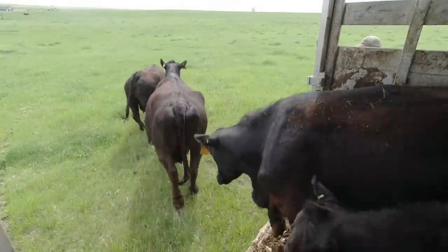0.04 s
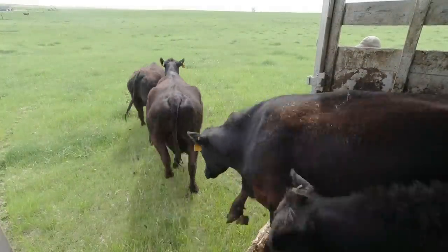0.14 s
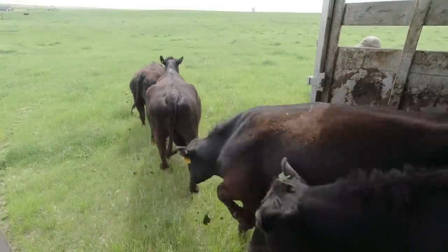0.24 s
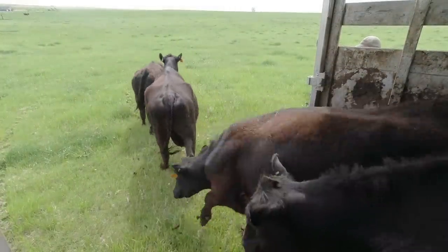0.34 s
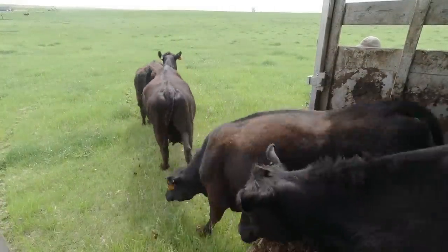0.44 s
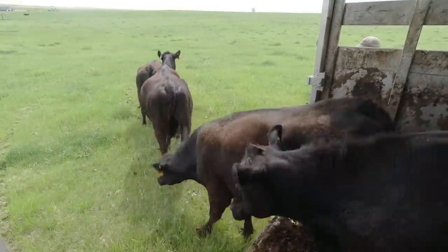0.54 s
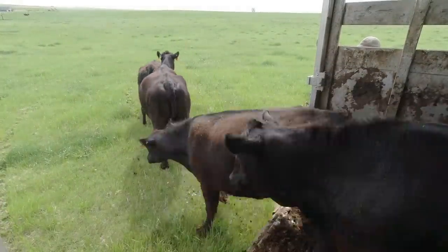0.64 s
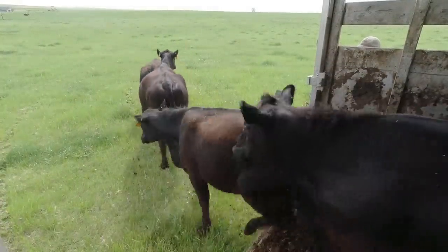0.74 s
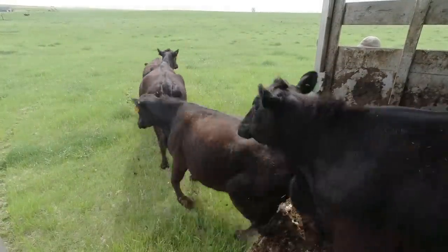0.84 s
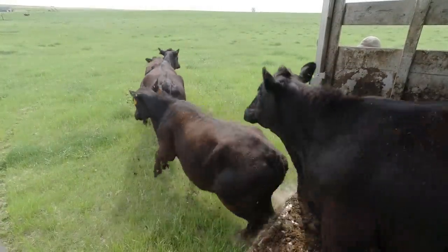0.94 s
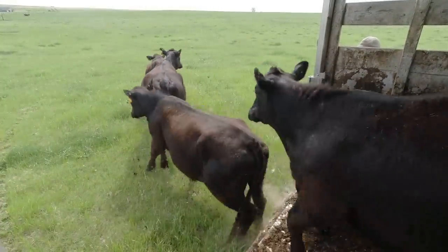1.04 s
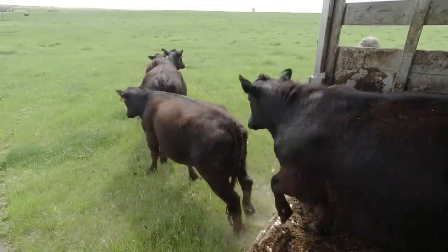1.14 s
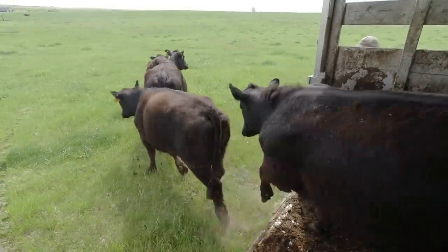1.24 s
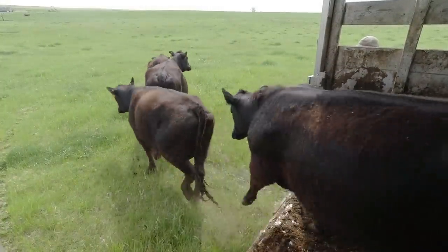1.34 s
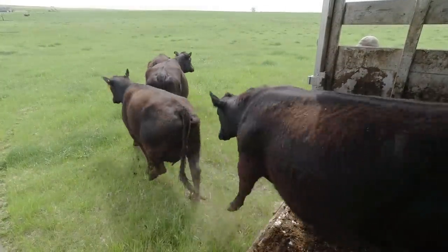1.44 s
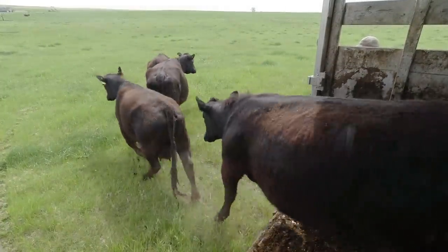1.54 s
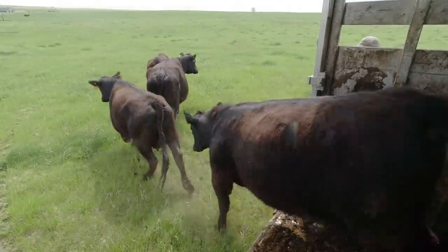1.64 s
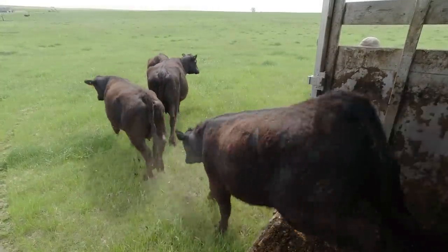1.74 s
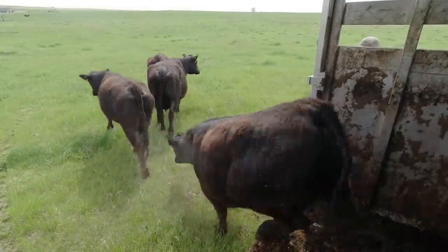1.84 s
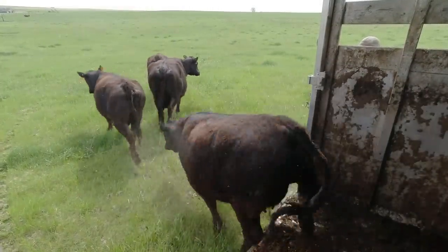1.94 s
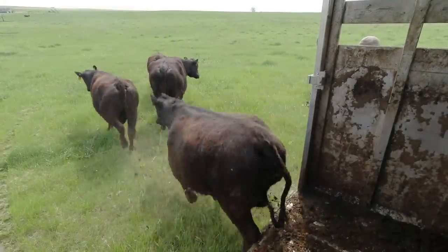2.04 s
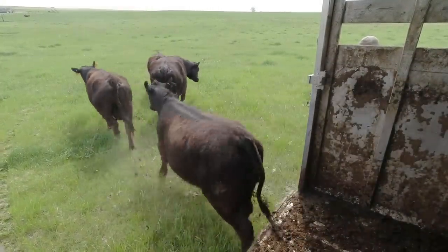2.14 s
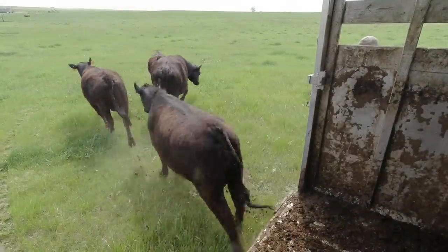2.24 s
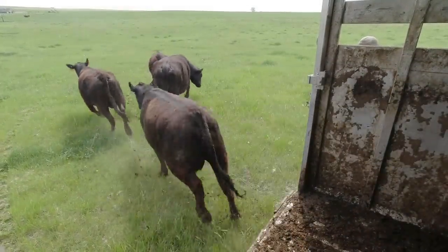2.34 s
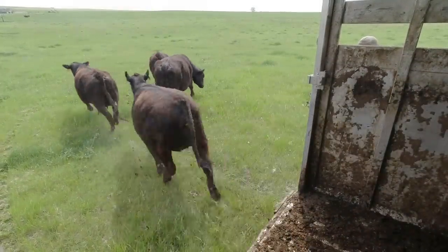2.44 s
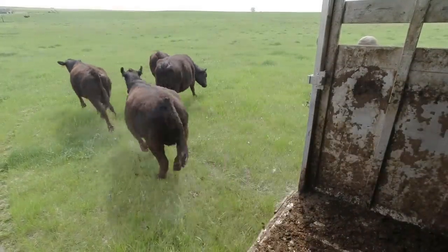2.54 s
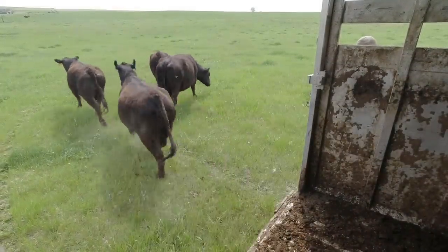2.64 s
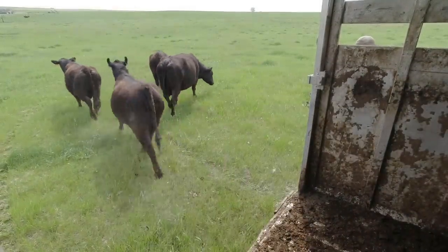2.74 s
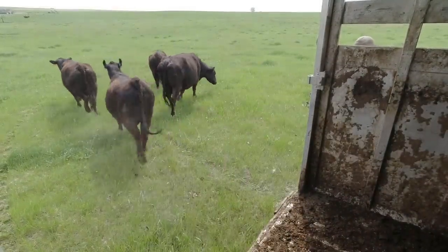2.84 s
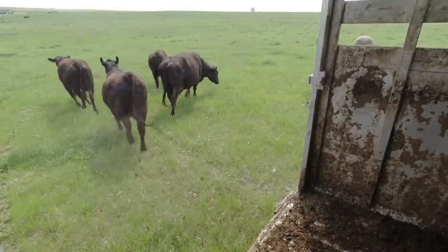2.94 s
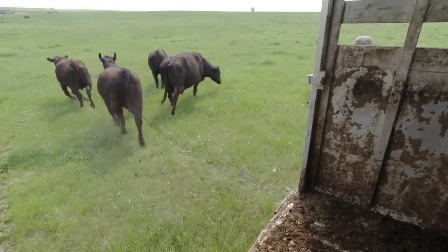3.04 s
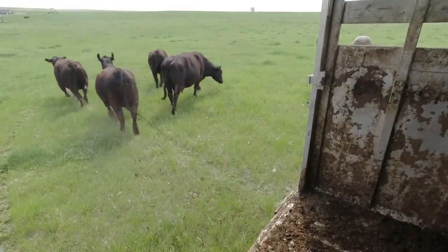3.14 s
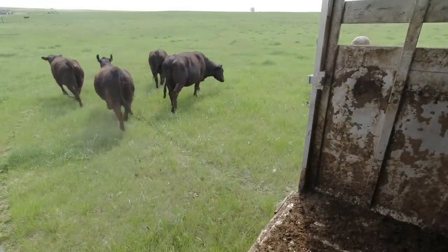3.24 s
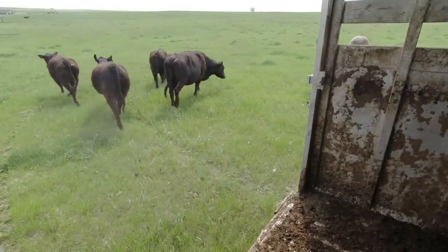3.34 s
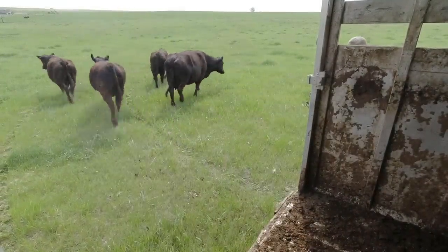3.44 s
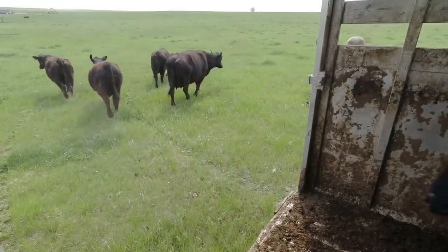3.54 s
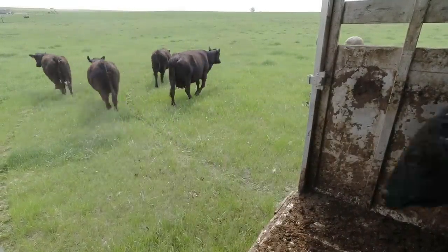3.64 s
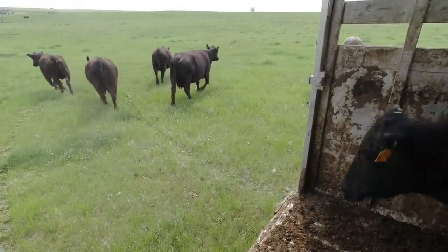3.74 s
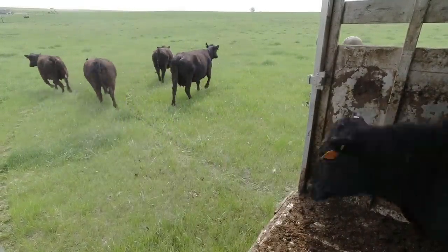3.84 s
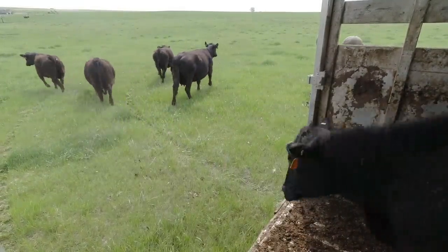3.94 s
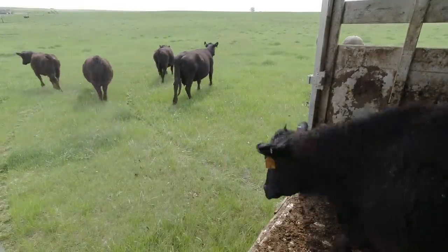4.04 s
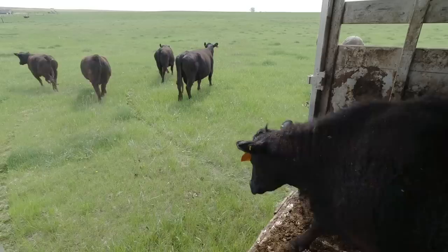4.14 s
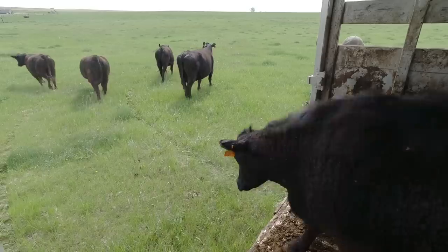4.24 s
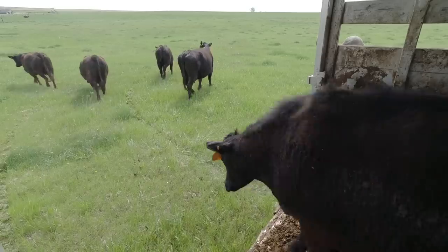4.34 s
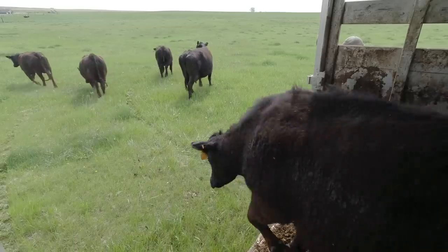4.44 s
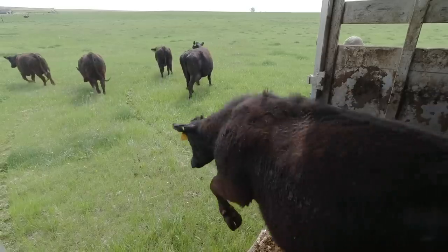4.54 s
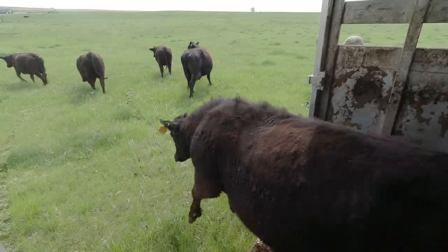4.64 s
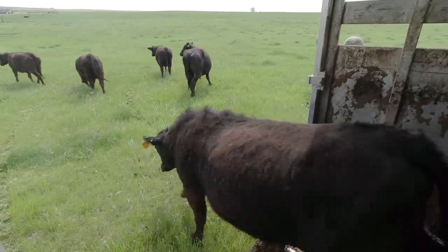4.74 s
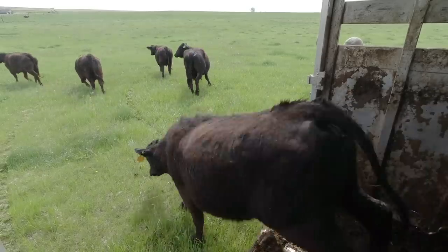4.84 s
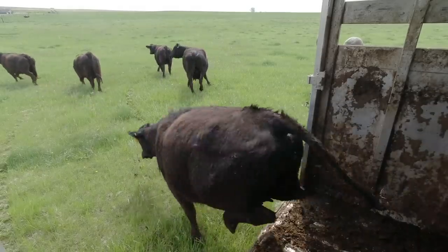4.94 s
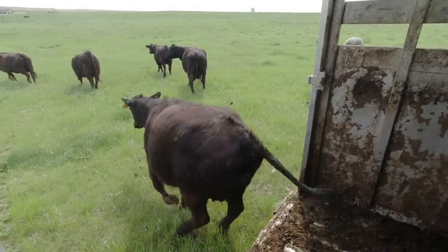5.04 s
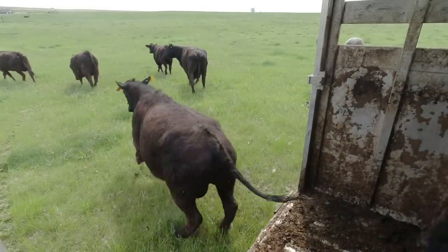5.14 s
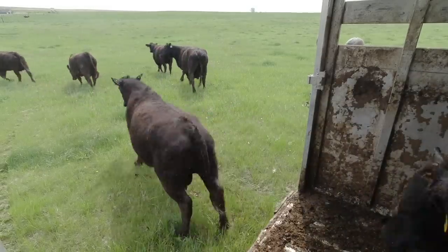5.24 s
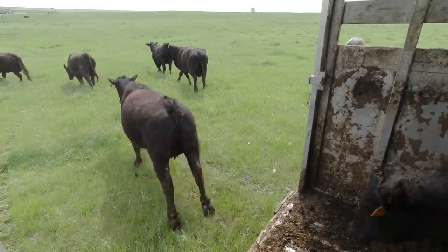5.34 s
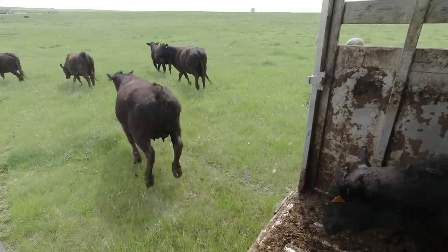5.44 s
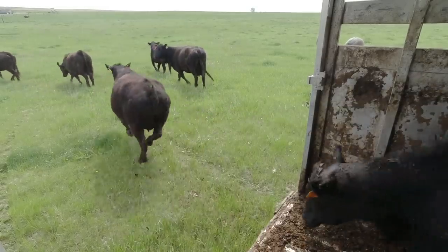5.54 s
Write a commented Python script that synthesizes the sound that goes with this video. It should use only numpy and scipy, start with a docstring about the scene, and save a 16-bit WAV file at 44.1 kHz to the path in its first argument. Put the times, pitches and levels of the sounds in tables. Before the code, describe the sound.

Close to the microphone, heavy hooves land in irregular clusters on a steel trailer floor, with deep thuds, short metallic clanks and gritty slides as cattle leave. A low, uneven rumble and rustle comes from the animals still inside. After a loud start the knocks grow lighter and sparser, a cow hums one brief, quiet moo beneath them, and the hoofbeats pick up again toward the end.

```python
"""Cattle leaving a steel trailer

Heard from close beside a livestock trailer, on a stereo microphone. Cattle step out: hooves thump
the sprung floor, knock the ringing side panels and scuff through dry muck. One cow gives a low,
closed-mouth moo. From further inside comes the rumble and rustle of other animals shuffling."""
import sys
import numpy as np
from scipy import signal
from scipy.fft import rfft, irfft, next_fast_len
from scipy.io import wavfile
from scipy.ndimage import uniform_filter1d, map_coordinates

SR = 44100
rng = np.random.default_rng(int(sys.argv[2]) if len(sys.argv) > 2 else 0)


def generate_wav(signal):
    """Clip the signal to [-1, 1] and save it as 16-bit WAV at the path in sys.argv[1]."""
    frames = np.transpose(np.atleast_2d(signal))
    scaled = np.clip(frames, -1, 1) * 32767
    pcm = np.round(scaled).astype(np.int16)
    wavfile.write(sys.argv[1], SR, pcm)


N = 247401


def amp(db):
    """Decibels to gain."""
    return 10 ** (np.asarray(db) / 20)


def unit(x):
    """Scaled to rms 1."""
    return x / np.sqrt(np.mean(x ** 2) + 1e-20)


def along(points, hz):
    """Read a curve of (frequency, value) points on a log axis."""
    f, v = np.transpose(points)
    return np.interp(np.log(hz + 1), np.log(f + 1), v)


def near(hz, centre_hz, octaves):
    """Gain that falls off with the distance in pitch from a centre."""
    return 1 / (1 + (np.log2((hz + 1) / centre_hz) / octaves) ** 2)


def filtered(x, response):
    """Pass x through a complex frequency response."""
    n = x.shape[-1]
    padded = next_fast_len(n + SR // 10)
    return irfft(rfft(x, padded) * response(np.fft.rfftfreq(padded, 1 / SR)), padded)[..., :n]


def noise(count, gain):
    """Noise of rms 1, coloured by a gain over frequency."""
    return unit(irfft(rfft(rng.standard_normal(count)) * gain(np.fft.rfftfreq(count, 1 / SR)), count))


def wobble(rate, count=N):
    """A smooth random curve, rate knots a second."""
    knots = rng.standard_normal(int(count * rate / SR) + 4)
    return map_coordinates(knots, [np.arange(count) * rate / SR])


def chance_field(shape, size):
    """Random values of rms 1, smooth over size = (frequency bins, time steps)."""
    return unit(uniform_filter1d(uniform_filter1d(rng.standard_normal(shape), size[0], 0), size[1], 1))


def patchy(x, depth_db, size):
    """Give x patches of random gain over frequency and time."""
    spectra = signal.stft(x, nperseg=512)[2]
    patches = amp(depth_db * chance_field(spectra.shape, size))
    return signal.istft(spectra * patches, nperseg=512)[1][:N]


def stroke(t, rise, t60, first):
    """Envelope: first contact, a swell to 1 as the weight comes on, then an even decay."""
    rise, t60 = max(rise, 1e-3), max(t60, .02)
    swell = first + (1 - first) * np.sin(np.pi / 2 * np.minimum(t / rise, 1)) ** 2
    return swell * amp(-60 * np.maximum(t - rise, 0) / t60) * (1 - np.exp(-t / 4e-4))


def add(track, s, sound):
    """Mix a sound in at s seconds."""
    part = track[round(s * SR):][:len(sound)]
    part += sound[:len(part)]


# Movement deep in the trailer: (time [s], rumble level [dB], rustle level [dB])
HERD_MOVEMENT = [(.05, -49, -58), (.15, -39.5, -45.5), (1.08, -37, -48.5), (1.299, -46, -55.5),
                 (1.48, -45.5, -57), (1.6, -42, -46), (2.2, -40, -49), (3.08, -49.5, -49.5),
                 (3.699, -51.5, -60), (4.501, -48.5, -60), (4.8, -41.5, -51), (5.06, -49.5, -58.5),
                 (5.201, -37, -43), (5.39, -44.5, -49), (5.5, -32, -45)]
# Colours of its rumble and its rustle: (frequency [Hz], level [dB])
RUMBLE_SPECTRUM = [(25, 1), (80, 5.5), (200, -4), (330, -65), (900, -120)]
RUSTLE_SPECTRUM = [(130, -28.5), (220, -2), (530, -5), (800, -17), (1400, -22.5), (1700, -24.5),
                   (4000, -35), (8500, -47.5), (15500, -72)]
def herd_shuffle():
    """Further inside, many small movements blur into an uneven rumble and rustle."""
    times, rumble_db, rustle_db = np.transpose(HERD_MOVEMENT)
    t = np.arange(N) / SR
    rumble_gain = amp(np.interp(t, times, rumble_db) + 0.22 * wobble(0.83))
    rumble = noise(next_fast_len(N), lambda f: amp(along(RUMBLE_SPECTRUM, f)))[:N]
    rustle = noise(next_fast_len(N), lambda f: amp(along(RUSTLE_SPECTRUM, f)))[:N]
    rustle_gain = amp(np.interp(t, times, rustle_db) + 2.2 * wobble(10))
    return rumble_gain * rumble + rustle_gain * patchy(rustle, depth_db=3, size=(8, 10))


# One quiet call under the hoof noise: (time [s], pitch [Hz], level [dB])
MOO_CONTOUR = [(3.98, 87.2, -44), (4.079, 82, -44.5), (4.22, 79.8, -49), (4.326, 87.4, -39.5),
               (4.559, 87.2, -44)]
# Its harmonics through the nose, fundamental first: (level [dB])
NASAL_HARMONICS = [7, -9, -13.5, -10, -11, -18.5]
def cow_moo():
    """Vocal folds vibrate behind a shut mouth: a few clean harmonics that waver a little."""
    times, hz, db = np.transpose(MOO_CONTOUR)
    out, t = np.zeros(N), np.arange(times[0], times[-1], 1 / SR)
    pitch = np.interp(t, times, hz) * (1 + 0.014 * wobble(39, len(t)))
    phase = 2 * np.pi * np.cumsum(pitch) / SR
    call_db = np.interp(t, times, db)
    tilt_db = 0.35 * (call_db - db.max())  # a weaker call has weaker overtones
    voice = sum(amp(level + k * tilt_db + 1.6 * wobble(26, len(t))) * np.sin((k + 1) * phase + k)
                for k, level in enumerate(NASAL_HARMONICS))
    fade = np.clip(np.minimum(t - times[0], times[-1] - t) / 0.065, 0, 1)
    add(out, times[0], unit(voice) * amp(call_db) * fade)
    return out


# Hooves sliding through dry muck: (time [s], level [dB], brightness [dB/octave], rise [s])
HOOF_SLIDES = [(0.116, -37.5, -4.5, 0.0045), (0.19, -48, 0.5, 0.071), (0.388, -39, -2.5, 0.062),
               (0.685, -60, 6, 0.001), (0.806, -32.5, -4.5, 0.033), (0.861, -28, -3.5, 0.0075),
               (0.912, -46, -1.5, 0.016), (0.965, -43.5, -3, 0.018), (1.046, -48.5, 0.5, 0.0021),
               (1.703, -45.5, 3, 0.0031), (1.723, -32, -3, 0.009), (1.852, -46, -1, 0.0011),
               (1.919, -27, -4.5, 0.012), (1.968, -33, -3.5, 0.04), (2.251, -54.5, 2, 0.0039),
               (2.298, -43, 5, 0.0069), (2.331, -36, 3, 0.0013), (2.474, -37, 1.5, 0.0033),
               (2.636, -56.5, 4, 0.01), (2.75, -43, -12, 0.0042), (2.841, -46, 1.5, 0.018),
               (3.111, -57.5, 1.7, 0.0021), (3.263, -50.5, -2, 0.027), (3.382, -49, -4.5, 0.0043),
               (3.476, -55, 4, 0.015), (3.773, -65, 9, 0.012), (4.128, -52, 4.5, 0.0084),
               (4.548, -38.5, -3.5, 0.02), (4.758, -50.5, -1.5, 0.064), (5.041, -61, 1, 0.032),
               (5.107, -36, -3.5, 0.022), (5.311, -48.5, 5, 0.0089), (5.409, -55.5, 3.5, 0.064)]
# Colour of crushed grit: (frequency [Hz], level [dB])
GRIT_SPECTRUM = [(700, 0), (1600, 1), (3300, 0), (4100, -5), (5500, -10), (8500, -16), (10000, -26.5),
                 (15500, -30)]
def hoof_scuffs(cracks_per_s=500):
    """Grit crushed under a sliding hoof: lumpy hiss with small cracks, brighter near the door."""
    out, t = np.zeros(N), np.arange(SR // 2) / SR
    for s, db, tilt_db, rise in HOOF_SLIDES:
        hiss = noise(len(t), lambda f: amp(along(GRIT_SPECTRUM, f) + tilt_db * np.log2((f + 1) / 5000)))
        add(out, s, amp(db) * hiss * stroke(t, rise, t60=0.26, first=1 / (1 + rise / 0.004)))
    cracking = rng.random(N) < cracks_per_s / SR
    cracks = cracking * amp(-7 + 2 * rng.standard_normal(N).clip(-2, 2))
    crack_decay = amp(-60 * t[:SR // 100] / 0.018)
    grains = 1 + np.convolve(cracks, crack_decay)[:N]  # each crack briefly lifts the hiss
    return patchy(out * unit(grains), depth_db=1.5, size=(14, 6))


def rattling_blow(t, rise, centre_hz, clank_db):
    """Uneven contact with steel: a dull push and a brighter clank, with a crack if it is quick."""
    dull = noise(len(t), lambda f: near(f, centre_hz, octaves=0.76) ** 2)
    clank = noise(len(t), lambda f: near(f, 900, octaves=1.41) ** 2 / (1 + (f / 5000) ** 2))
    edge = noise(len(t), lambda f: near(f, 2400, octaves=0.6) ** 2)
    crack = min(1, 0.005 / rise) * amp(-60 * t / 0.03) * edge
    # a slow push starts softly and dies slowly
    envelope = lambda t60: stroke(t, rise, t60 + 1.72 * rise, first=1 / (1 + rise / 0.081))
    blow = dull * envelope(t60=0.21) + amp(clank_db) * (clank + crack) * envelope(t60=0.2)
    rattle = unit(amp(2 * wobble(110, len(t))))
    return blow * rattle


# Hooves and flanks on the side panels: (time [s], level [dB], clank [dB], rise [s], centre [Hz])
PANEL_BLOWS = [(0.082, -41.5, -5, 0.012, 536), (0.134, -32.5, -3, 0.06, 435),
               (0.235, -25.5, -0.5, 0.022, 550), (0.384, -32.5, -9, 0.0078, 577),
               (0.439, -18, -9, 0.015, 428.5), (0.566, -25.5, -9, 0.015, 411), (0.605, -26, -6, 0.016, 423),
               (0.748, -29, -14.5, 0.0051, 451), (0.804, -42.5, 12.5, 0.0055, 1730),
               (0.883, -40.5, 11, 0.0018, 2600), (1.056, -36.5, -6.5, 0.028, 326),
               (1.298, -58.5, -3, 0.034, 2060), (1.516, -20.5, -2, 0.0086, 455),
               (1.694, -30, -4.5, 0.035, 418), (1.851, -26, -4, 0.019, 435), (1.971, -27.5, -3, 0.028, 453),
               (2.007, -42.5, -1, 0.0045, 2950), (2.3, -40.5, 7, 0.073, 440), (2.476, -44.5, 6, 0.057, 340),
               (2.752, -18, -4.5, 0.0039, 532), (2.916, -42, 10.5, 0.034, 1340),
               (3.22, -44, -0.5, 0.026, 520), (3.395, -43.5, -4.5, 0.014, 472),
               (3.504, -31, -7.5, 0.011, 393), (3.747, -49, 3.5, 0.025, 333),
               (3.842, -35.5, -50, 0.015, 462), (3.925, -37, -27, 0.003, 451),
               (4.029, -43.5, -13.5, 0.02, 407), (4.241, -35, -8, 0.036, 457),
               (4.553, -37.5, -0.5, 0.022, 1414), (4.603, -23.5, -4, 0.0073, 556),
               (4.775, -35.5, -8, 0.068, 462), (4.903, -31.5, -9, 0.0016, 466),
               (4.984, -41.5, -20, 0.002, 494), (5.104, -31.5, -4.5, 0.045, 435),
               (5.287, -40, -6, 0.03, 550), (5.319, -42, -15, 0.0027, 2040), (5.471, -34, -1, 0.045, 422)]
# Modes of a steel panel: (frequency [Hz], width [Hz], level [dB])
PANEL_MODES = [(326.5, 113, -6.5), (441, 17.8, -4.5), (530.4, 17, -8.5), (589, 47, -15.5), (847, 48, -12.5),
               (1057, 55, -3), (1232, 15, -4), (1494, 17.6, -7), (1690, 44, -27), (2100, 14, 2),
               (2635, 18, -3.5), (3460, 130, 1.5)]
def panel_knocks(spot_q=14.7, hard_rise_s=0.006):
    """Each blow drives the panel modes at new strengths; a hard one leaves them ringing freely."""
    out, t = np.zeros(N), np.arange(SR * 2 // 5) / SR
    contact = lambda f: 0.4 / np.sqrt(1 + (900 / (f + 1)) ** 2)  # the hoof itself has no bass
    for s, db, clank_db, rise, centre_hz in PANEL_BLOWS:
        blow = rattling_blow(t, rise, centre_hz, clank_db)
        modes = [(hz * rng.normal(1, 0.034), width, (-1) ** k * amp(level + rng.normal(0, 2.7)))
                 for k, (hz, width, level) in enumerate(PANEL_MODES)]
        modes.append((centre_hz, centre_hz / spot_q, amp(-1.5)))  # the struck spot's own pitch
        resonance = lambda f: sum(gain * 1j * f * width / (hz * hz - f * f + 1j * f * width)
                                  for hz, width, gain in modes)
        driven = filtered(blow, lambda f: contact(f) + resonance(f))
        # the free ring favours the struck spot and, in a clank, the high modes
        bite = lambda hz: amp(min(clank_db - 7, 0)) * (hz > 700) + near(hz, centre_hz, octaves=0.14)
        ring = sum(gain * bite(hz) * np.sin(2 * np.pi * hz * t) * np.exp(-np.pi * width * t)
                   for hz, width, gain in modes)
        hardness = min(1, hard_rise_s / rise) ** 2
        add(out, s, amp(db) * (driven + amp(-14.5) * hardness * ring))
    return out


# Weight landing close to the microphone: (time [s], level [dB], centre [Hz], chassis shake [dB])
FOOTFALLS = [(0.248, -20.5, 130, -7), (0.42, -29.5, 112, 3.5), (0.571, -15, 130, -6.5),
             (0.831, -17.5, 78.5, -8.5), (0.89, -19.5, 58.4, -17), (0.951, -26.5, 151, -5),
             (1.516, -26, 129, -9), (1.702, -36, 95, 0), (1.849, -19.5, 123.6, 1), (1.874, -24.5, 262, -27),
             (2.043, -22, 69, -13.5), (2.531, -34, 58, -9), (2.848, -29.5, 153, 5.5),
             (3.109, -37.5, 71.4, -5), (3.297, -38.5, 171, -4), (3.405, -31.5, 145.6, -12),
             (3.492, -32.5, 99.3, -5), (3.848, -25.5, 120, -4.5), (4.04, -33, 88, -25),
             (4.259, -27.5, 72, -12), (4.456, -34.5, 87, 5), (4.601, -18, 126, -5), (4.791, -28, 102, -14),
             (4.834, -27, 132, -10), (5.455, -29, 124, -11), (5.516, -25, 127, -15.5)]
# Modes of the floor, and of the frame on its springs: (frequency [Hz])
FLOOR_MODES = [60.9, 69, 84.8, 106.5, 138.7, 165.3, 216.6, 249.4, 279]
CHASSIS_MODES = [36.1, 47.1]
def floor_thumps():
    """Where the hoof lands decides which floor modes ring most; the chassis shakes below them."""
    out, t = np.zeros(N), np.arange(SR * 2 // 5) / SR
    ring = lambda hz: -np.sin(2 * np.pi * hz * rng.normal(1, 0.029) * t + rng.normal(0, 1.0))
    for s, db, centre_hz, shake_db in FOOTFALLS:
        t60 = 0.31 * (centre_hz / 100) ** -1.2  # lower thumps ring longer
        shares = near(np.array(FLOOR_MODES), centre_hz, octaves=0.2) + 0.031
        floor = sum(gain * ring(hz) for gain, hz in zip(shares / np.linalg.norm(shares), FLOOR_MODES))
        floor *= stroke(t, rise=0.015, t60=t60, first=1)
        shake = amp(shake_db) * sum(ring(hz) for hz in CHASSIS_MODES)
        shake *= stroke(t, rise=0.016, t60=1.66 * t60, first=0.11)
        add(out, s, amp(db) * (floor + shake))
    return filtered(out, lambda f: 1 / (1 + 1j * f / 700) ** 2)  # muck softens the contact


# Scattered sound at the microphone, relative to the direct: (frequency [Hz], level [dB])
SCATTER_SPECTRUM = [(60, -47.5), (500, -17), (1400, -5), (3000, -0.5)]
# How much earlier sound reaches the right port: (frequency [Hz], lead [microseconds])
RIGHT_LEAD = [(1700, 30), (4000, 120), (8000, 184)]
def scene():
    """Two closely spaced microphone ports: the right hears first, and a scattered part differs."""
    direct = floor_thumps() + panel_knocks() + hoof_scuffs() + herd_shuffle() + cow_moo()
    spectra = signal.stft(direct, nperseg=512)[2]
    # bodies move, so the paths keep changing
    paths = chance_field(spectra.shape, size=(3, 8)) + 1j * chance_field(spectra.shape, size=(3, 8))
    scattered = signal.istft(spectra * paths / np.abs(paths), nperseg=512)[1][:N]
    side = filtered(scattered, lambda f: amp(along(SCATTER_SPECTRUM, f)))
    port_delays = lambda f: np.exp(1j * np.pi * 1e-6 * np.outer([-1, 1], f * along(RIGHT_LEAD, f)))
    return filtered(np.array([direct + side, direct - side]), port_delays)


def record(dry):
    """The microphone loses the deepest bass and passes nothing above its band limit."""
    low_cut_hz, top_hz = 44, 15780
    return filtered(dry, lambda hz: (1j * hz / (1j * hz + low_cut_hz)) ** 2 * (hz < top_hz))


dry = scene()
out = record(dry)
generate_wav(out)
```